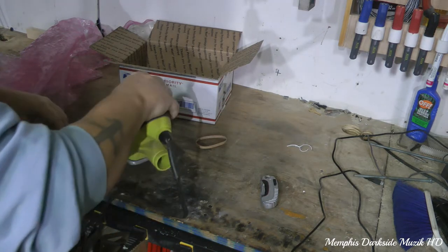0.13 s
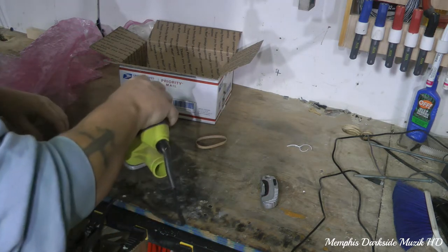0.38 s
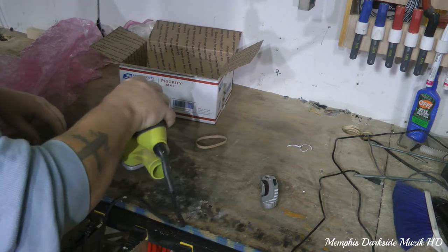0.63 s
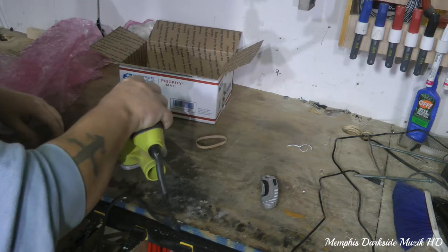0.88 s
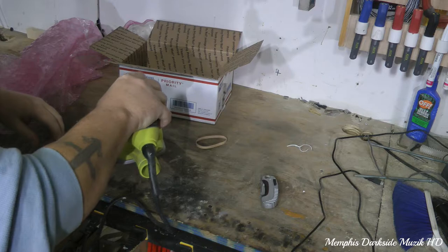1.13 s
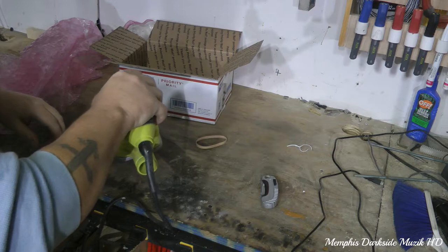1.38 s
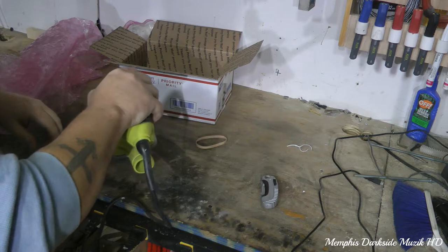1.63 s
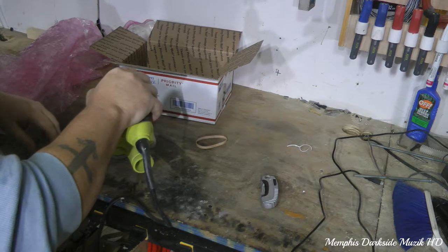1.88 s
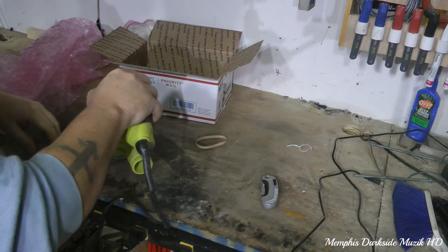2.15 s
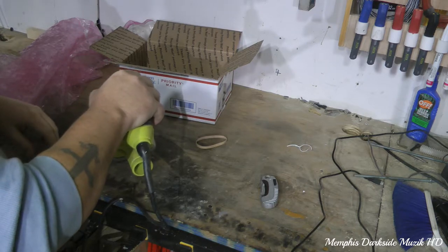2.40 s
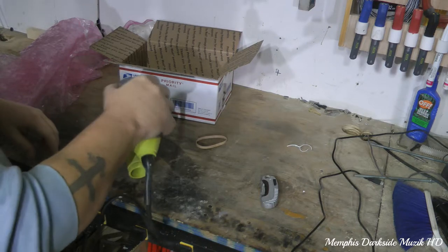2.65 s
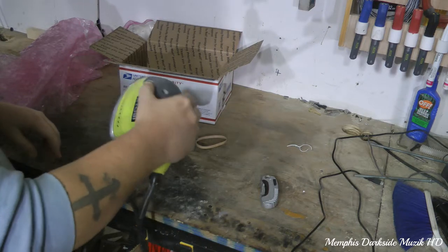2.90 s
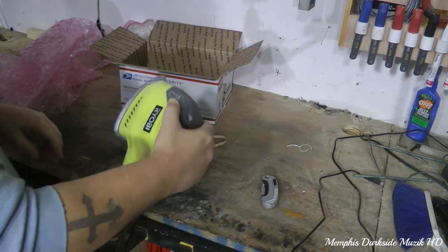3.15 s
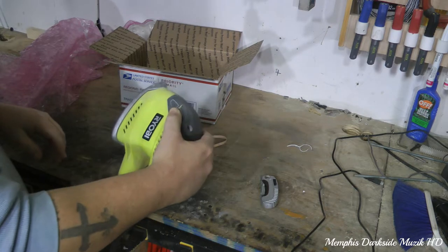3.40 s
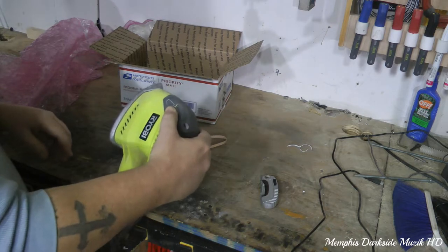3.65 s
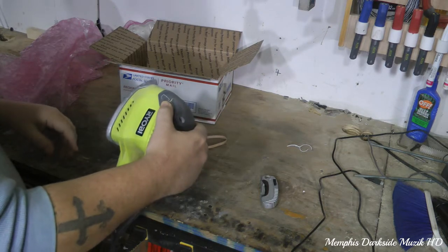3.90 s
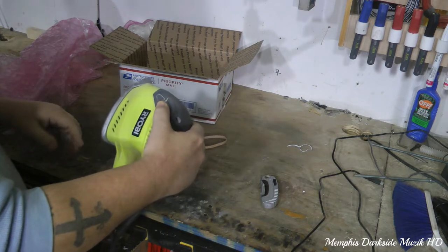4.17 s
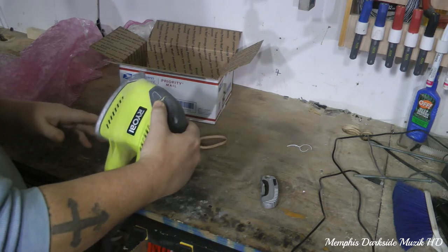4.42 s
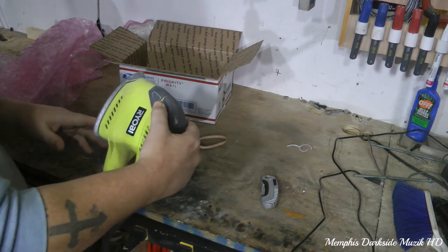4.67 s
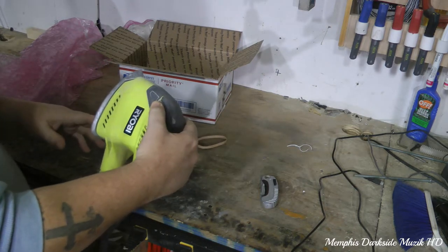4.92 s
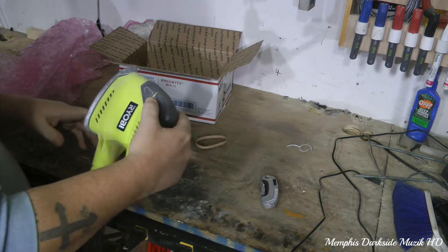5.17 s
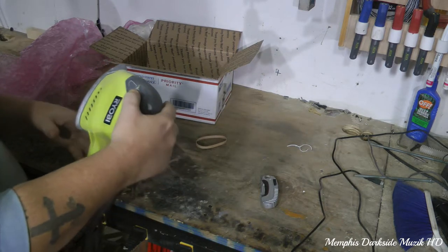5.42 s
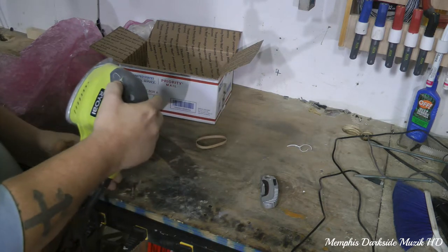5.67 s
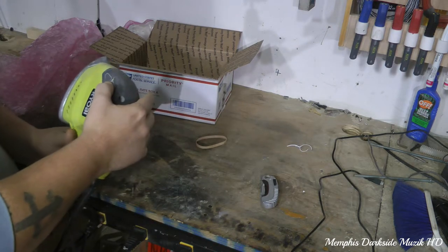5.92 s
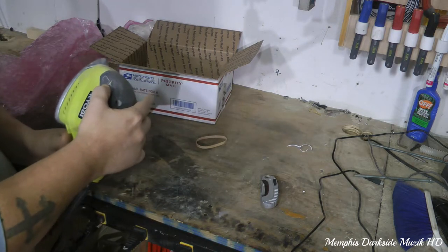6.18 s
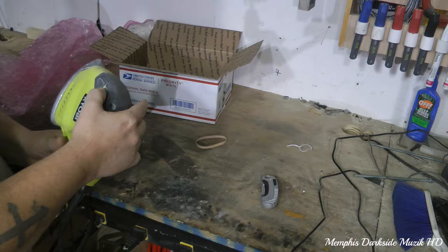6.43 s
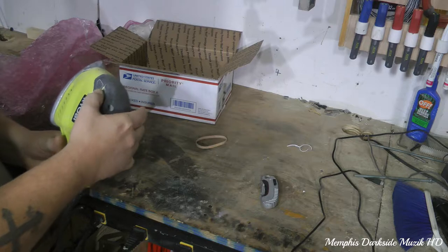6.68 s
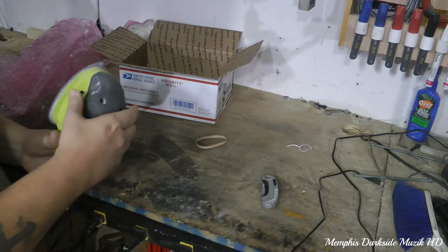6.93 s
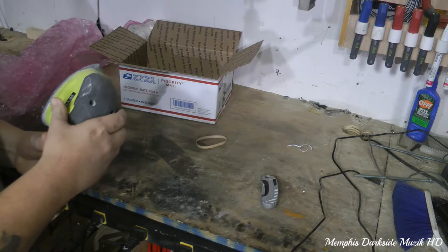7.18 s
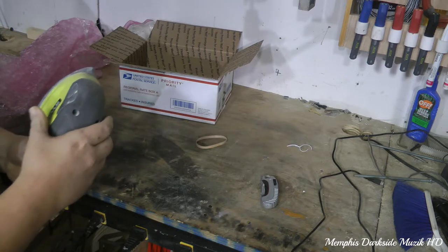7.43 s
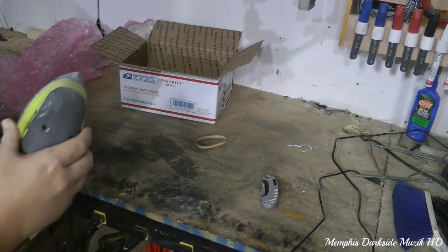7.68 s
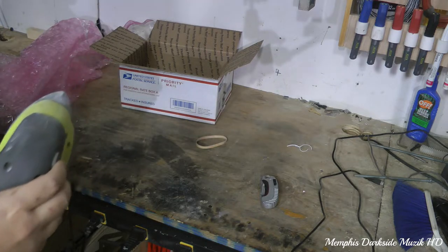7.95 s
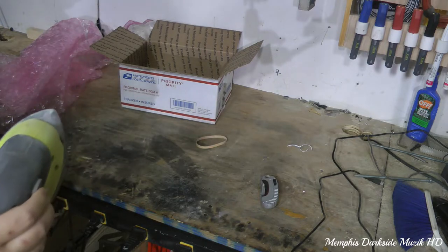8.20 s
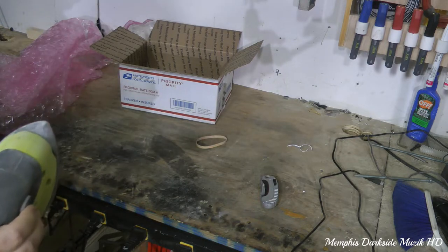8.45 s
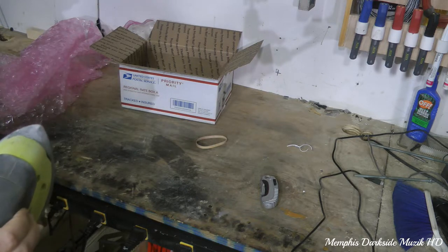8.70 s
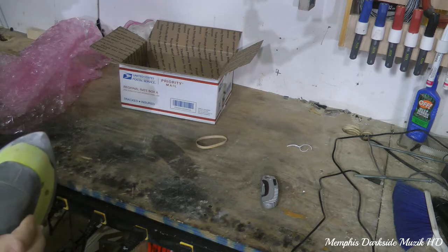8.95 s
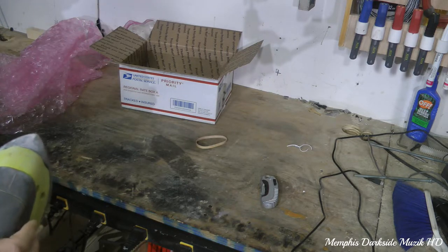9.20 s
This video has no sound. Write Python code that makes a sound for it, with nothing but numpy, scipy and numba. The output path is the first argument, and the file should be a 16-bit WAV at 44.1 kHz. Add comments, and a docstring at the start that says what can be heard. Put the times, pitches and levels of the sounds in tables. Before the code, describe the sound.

Close recording of a corded sander running unloaded. After a brief quiet of room rumble, a hard plastic click starts the motor, which rises within a second to a buzzing, hissing roar, its tones swelling as the tool is turned. A sharper click cuts power, the whine sinks and fades for over a second, then a last click starts it rising again.

```python
"""A small workshop: a hand-held palm sander is switched on, runs free in the air, is switched off, coasts to a stop
and is switched on again. Rotor unbalance, armature slots, fan blades and brushes are sines on multiples of the
shaft speed; the roar of cooling air is shaped noise that follows the speed. The rocker switch is chatter ringing
in housing modes. Ventilation noise, drone and mains hum lie below, ducked by the recorder's gain control."""
import sys
import numpy as np
from scipy import signal
from scipy.fft import rfft, irfft
from scipy.io import wavfile
from numba import njit

SR = 44100
rng = np.random.default_rng(int(sys.argv[2]) if len(sys.argv) > 2 else 0)


def master_out(mix):
    """Clip the mix to full scale and print it as 16-bit PCM to the path in sys.argv[1]."""
    frames = np.transpose(np.atleast_2d(mix))
    ceiling = np.clip(frames, -1, 1)
    pcm = np.round(ceiling * 32767).astype(np.int16)
    wavfile.write(sys.argv[1], SR, pcm)


def field_ratio(decibels):
    """Amplitude ratio for a level in dB (20 dB per decade); scalars and array-likes work."""
    return 10 ** (np.asarray(decibels, dtype=float) / 20)


N = 411453
HZ = np.maximum(np.fft.rfftfreq(N, 1 / SR), 1)
TIME = np.arange(N) / SR
FULL_SPEED = 190    # turns per s, the reference for the tone levels
MAINS_RIPPLE_HZ, CUTOFF_HZ = 120, 15850


def rms_one(x):
    """Scale to unit rms."""
    return x / np.sqrt(np.mean(x ** 2) + 1e-20)


def in_time(rows):
    """Columns of a table as curves, one value a sample."""
    s, *columns = np.transpose(rows)
    return [np.interp(TIME, s, column) for column in columns]


def at_hz(points, hz):
    """Read a spectrum on a log-frequency axis."""
    point_hz, value = np.array(points).T[:2]
    return np.interp(np.log(hz), np.log(np.maximum(point_hz, 1)), value)


def bump(hz, width_hz):
    """Bell of a resonance, 1 on top."""
    return 1 / (1 + (2 * (HZ - hz) / width_hz) ** 2)


def drift(rate_hz):
    """Slow random wander of spread 1: noise through two equal one-pole lowpasses, one value per 64 samples."""
    r = np.exp(-128 * np.pi * rate_hz / SR)
    slow = signal.lfilter([1], [1, -2 * r, r * r], rng.standard_normal(N // 64 + 2002))[2000:]
    return np.interp(np.arange(N) / 64, np.arange(len(slow)), rms_one(slow))


# Likeness of the two microphone ports: pitch_hz, likeness (0 to 1)
PORT_LIKENESS = [(60, 0.17), (180, 0.17), (550, 0.63), (1650, 0.77), (4970, 0.92), (15000, 0.83)]
# Balance of the ports: pitch_hz, left_over_right_db
PORT_BALANCE = [(60, 1), (190, -3), (380, 2.5), (1000, 2), (2400, 1.7), (5000, 0.6), (15000, 1)]


def stereo_noise():
    """Spectrum of white noise as two close microphone ports hear it."""
    mid, side = rfft(rng.standard_normal((2, N)))
    alike = np.sqrt(np.clip(at_hz(PORT_LIKENESS, HZ), 0, 1))
    pair = np.sqrt(1 + alike) * mid + np.sqrt(1 - alike) * side * [[1], [-1]]
    return pair * field_ratio(at_hz(PORT_BALANCE, HZ) * [[.5], [-.5]])


def tone(phase, level_db, waver_db, hz, in_step=False):
    """A wavering sine that reaches the two ports with their own level and, most in the bass, their own phase."""
    half = np.array([[.5], [-.5]])
    lag = .5 * rng.standard_normal() * np.sqrt(1 - np.clip(at_hz(PORT_LIKENESS, hz), 0, 1))
    sides = field_ratio(at_hz(PORT_BALANCE, hz) * half) * np.exp(1j * lag * half)
    start_phase = 0 if in_step else rng.uniform(0, 2 * np.pi)
    wave = np.exp(1j * (phase + start_phase))
    return np.sqrt(2) * field_ratio(level_db + waver_db * drift(5.7)) * (sides * wave).real


def sander():
    """Tones locked to the shaft over the roar; silent while the shaft stands."""
    speed, current = motor()
    shaft = 2 * np.pi * np.cumsum(speed * (1 + 0.000304 * drift(5.38))) / SR
    roar_db, low_db, treble_db = roar_levels(speed, current)
    steady, gliding = strong_voices(speed, current, shaft)
    brush_whine = brushes(speed, current, shaft, roar_db + treble_db)
    out = roar(shaft, roar_db, low_db, treble_db) + steady
    out += weak_orders(speed, shaft, roar_db)
    out += among_walls(gliding + brush_whine)
    out += housing_ring(speed, current, roar_db)
    out += shaking(roar_db)
    turning = speed > 4
    return out * signal.lfilter([.003], [1, -.997], turning)    # soft gate


# Motor under power: on_s, off_s, free_speed_turns_per_s (before the creep)
POWER_RUNS = [(0.6189, 6.30, 187.12), (8.607, 10, 189)]


def motor():
    """Shaft speed and share of current: it rises to free speed under power, then drag and friction stop it."""
    spin_up_s, settle_s, settle_share = 0.3103, 0.94, 0.0533    # quick rise, slow rest
    creep = 0.9745    # turns per s gained each second as it warms
    coast_s, friction_speed = 2.3, 276    # speed + friction_speed decays with coast_s
    field_dies_s = 0.09
    speed, current = np.zeros(N), np.zeros(N)
    for on_s, off_s, free_speed in POWER_RUNS:
        powered = np.clip(TIME, on_s, off_s) - on_s
        rise = 1 - (1 - settle_share) * np.exp(-powered / spin_up_s) - settle_share * np.exp(-powered / settle_s)
        driven = free_speed * rise + creep * powered
        after = np.maximum(TIME - off_s, 0)
        speed += np.maximum((driven + friction_speed) * np.exp(-after / coast_s) - friction_speed, 0)
        current += (TIME > on_s) * np.exp(-after / field_dies_s)
    return speed, current


def tone_bite(speed):
    """Tones die away when the shaft turns slowly."""
    return np.minimum(speed / 78, 1) ** 6


def below_full(speed):
    """How far the shaft is below full speed: 0 at full speed, 1 from two thirds of it down."""
    return np.clip(3 * (1 - speed / FULL_SPEED), 0, 1)


# Unbalance and its octave, slot tone with two mains sidebands, fan blades, slot overtones:
# shaft_multiple, mains_ripples_added
VOICES = [(1, 0), (2, 0), (12, -1), (12, 0), (12, 1), (20, 0), (24, 0), (36, 0)]
# Each voice against speed: fade_speed_turns_per_s (half amplitude), steepness, low_speed_db, coasting_db
VOICE_LAWS = [(149, 6.8, -5, -7.5), (111, 6.7, -5, -6), (156, 15, 7, -25), (148, 7, -8, -11),
              (140, 4, 0, -28), (144, 12, -7, -7), (87, 14, 8.5, -7), (148, 11, 0, 2)]
# Each voice swelling and fading as the tool is turned in the hand: time_s, level_db
VOICE_LEVELS = [
    [(1.2, -12.5), (1.9, -16.5), (2.7, -15), (3.7, -17), (4.6, -14.5), (5.7, -18), (6.3, -17), (8.6, -27)],
    [(1.1, -34), (2.9, -32.5), (3.3, -36.5), (6.0, -39.5), (8.6, -45)],
    [(1.5, -24), (2.0, -18), (2.6, -21), (3.1, -15.5), (4.55, -12.5), (4.8, -24), (5.1, -29), (5.6, -32),
     (6.3, -42)],
    [(1.55, -15.5), (2.1, -28), (3.0, -11.5), (3.25, -23), (3.6, -13.5), (4.5, -21), (5.3, -12.5),
     (5.8, -15), (6.3, -21), (8.6, -16)],
    [(1.55, -37), (1.8, -15), (2.5, -23), (2.9, -9), (3.2, -26), (3.5, -16.5), (5.35, -11.5), (5.55, -19.5),
     (6.3, -13), (8.6, -28)],
    [(1.35, -14), (2.2, -14.5), (2.72, -9.5), (2.9, -22), (3.6, -17.5), (4.5, -21), (4.75, -25),
     (5.1, -15.5), (6.3, -16), (8.6, -16)],
    [(1.2, -28), (1.55, -31), (1.85, -25), (2.2, -26), (2.7, -21.5), (3.6, -40), (4.75, -16), (5.4, -24),
     (6.3, -26), (8.6, -29)],
    [(1.25, -17), (2.05, -34), (2.4, -20), (3.3, -15.5), (4.15, -22), (4.7, -12), (5.4, -20), (5.6, -23),
     (6.3, -24), (8.6, -18)],
]


def strong_voices(speed, current, shaft):
    """Sines of unbalance, slots and fan blades on shaft multiples, split into a steady and a gliding share."""
    bite, slow = tone_bite(speed), below_full(speed)
    crawling = 1 / (1 + np.exp((speed - 142) / 14))
    ripple = 2 * np.pi * MAINS_RIPPLE_HZ * TIME
    steady, glides = 0, 0
    for (multiple, ripples), law, levels in zip(VOICES, VOICE_LAWS, VOICE_LEVELS):
        fade_speed, steep, low_speed_db, coasting_db = law
        gliding = slow * (multiple > 1)    # a fast glide meets its own echoes from bench and walls
        level_db = in_time(levels)[0] + low_speed_db * crawling + coasting_db * (1 - current)
        level_db = level_db + 3.5 * gliding * drift(54)    # patchy while gliding
        waver_db = 1.5 if multiple > 1 else .6
        phase = multiple * shaft + ripples * ripple
        voice = tone(phase, level_db, waver_db, multiple * FULL_SPEED, in_step=True)
        voice = voice * bite / (1 + (fade_speed / (speed + 1)) ** steep)
        steady += np.sqrt(1 - gliding) * voice
        glides += np.sqrt(gliding) * voice
    return steady, glides


# Cooling air by shaft speed, with current:
# speed_turns_per_s, roar_db, low_db (relative), treble_db (relative)
ROAR_POWERED = [(9, -60, -20, -14), (16, -22.5, -18, -14), (45, -27.5, -10, -14.5), (65, -25.5, -13, -10.5),
                (91, -23, -11, -11), (113, -18, -14, -10), (131.4, -17.5, -7, -8), (148, -14, -10, -6),
                (176, -10.5, -12.5, -9)]
# The same columns without current
ROAR_COASTING = [(2.98, -45, -20, -7), (14, -40, -15, -10), (27, -33, -13, -13), (54, -25.5, -11.5, -8.5),
                 (90, -22, -7.5, -9.5), (123, -20, -11, -6), (145, -20, -7.5, -7), (175, -17, -12, -12.5),
                 (190, -7, -15, -9)]
# Offsets as the tool is turned in the hand: time_s, roar_db, treble_db, shaking_db
HAND_TURNS = [(1.75, -0.1, 0.5, -1), (2.1, -.5, -0.5, 2), (3.2, -0.5, 0, 0), (4.0, -0.5, -1.5, -1),
              (4.8, 0.8, -2, -4), (5.6, -1, -1, -4), (6.0, -1, -1, 1), (6.28, 0.6, -1, -1),
              (8.6, -2, -0.5, 4)]


def roar_levels(speed, current):
    """Roar, low part and treble part follow the speed, by one law with current and another without."""
    laws = np.transpose(ROAR_POWERED), np.transpose(ROAR_COASTING)
    powered, coasting = (np.array([np.interp(speed, law[0], c) for c in law[1:]]) for law in laws)
    roar_db, low_db, treble_db = current * powered + (1 - current) * coasting
    held_db, held_treble_db, _ = in_time(HAND_TURNS)
    return roar_db + current * held_db, low_db, treble_db + current * held_treble_db


# Relative spectrum of the cooling air: pitch_hz, level_db (per Hz)
AIR_SPECTRUM = [(150, -44), (260, -27.5), (380, -20), (509, -19.5), (565, -14), (648, -20), (757, -13),
                (884, -18.5), (1050, -15), (1950, -10), (2360, -6.5), (6530, -8.5), (10200, -18),
                (13900, -22.5), (16000, -23.5)]
# Housing resonances in the roar: pitch_hz, width_hz, boost_db
HOUSING_MODES = [(730, 270, 2.5), (1061, 11.5, 11.5), (1455, 140, 8.5), (1752, 93, 3)]


def roar(shaft, roar_db, low_db, treble_db):
    """Turbulent air through the housing, throbbing twice a turn and with the mains ripple."""
    housing_db = sum(db * bump(hz, width) for hz, width, db in HOUSING_MODES)
    colour = stereo_noise() * field_ratio(at_hz(AIR_SPECTRUM, HZ) + housing_db)
    above_low, above_mid = 1 / (1 + (1500 / HZ) ** 8), 1 / (1 + (6000 / HZ) ** 8)
    parts = 1 - above_low, above_low - above_mid, above_mid
    low, mid, top = (rms_one(irfft(colour * part, N)) for part in parts)
    throb = 1 + 0.072 * np.cos(2 * shaft) + 0.036 * np.cos(2 * np.pi * MAINS_RIPPLE_HZ * TIME)
    flutter = field_ratio(0.37 * drift(24))
    return field_ratio(roar_db) * throb * flutter * (field_ratio(low_db) * low + mid + field_ratio(treble_db) * top)


# Overtones of brushes on twelve commutator bars: shaft_multiple, level_db (over the roar's treble at its pitch)
BRUSH_TONES = [(48, 7), (60, 2), (72, 4), (84, 3.5), (96, 3), (108, 3.5), (120, 0), (132, 8), (144, -3),
               (156, 3)]


def brushes(speed, current, shaft, air_treble_db):
    """Brushes tick over the commutator; uneven bars make each overtone swell once a turn."""
    bite, slow = tone_bite(speed), below_full(speed)
    whine = 0
    for multiple, level_db in BRUSH_TONES:
        swell = 1 + 0.73 * np.cos(shaft + rng.uniform(0, 2 * np.pi))
        heard = multiple * speed < CUTOFF_HZ
        # below full speed the air is quieter against the brushes
        slow_db = 4 * (multiple > 48) - 2 * (1 - current) + 3 * drift(30)
        whine_db = level_db + air_treble_db + at_hz(AIR_SPECTRUM, multiple * speed + 1) + slow * slow_db
        overtone = tone(multiple * shaft, whine_db, 2.4, multiple * FULL_SPEED)
        whine += swell * heard * np.sqrt(bite) * overtone
    return whine


def among_walls(x):
    """Direct sound plus a short tail from bench and walls: glides blur and break up."""
    after = TIME[:SR // 5]
    tail = rng.standard_normal(len(after)) * field_ratio(-60 * after / .3)
    tail *= .8 / np.sqrt(np.sum(tail ** 2))
    tail[0] = .6    # direct sound
    return signal.oaconvolve(x, tail[None])[:, :N]


# Weak shaft multiples: shaft_multiple, level_db (at full speed and full roar)
WEAK_ORDERS = [(3, -37), (4, -34), (5, -36), (6, -41.5), (8, -30), (9, -33), (10, -31), (11, -35.5),
               (13, -63), (14, -30.5), (18, -27.5), (19, -27.5), (21, -29), (22, -33), (23, -31), (32, -30),
               (35, -32), (37, -30.5), (40, -40)]


def weak_orders(speed, shaft, roar_db):
    """Weak multiples follow the roar's level and take the colour of its air as they glide."""
    full_roar_db = -12
    out = 0
    for multiple, level_db in WEAK_ORDERS:
        full_hz = multiple * FULL_SPEED
        glide_db = at_hz(AIR_SPECTRUM, multiple * speed + 1) - at_hz(AIR_SPECTRUM, full_hz)
        out += tone(multiple * shaft, level_db + roar_db - full_roar_db + glide_db, 3.8, full_hz)
    return tone_bite(speed) * out


# Housing resonances heard below full speed: pitch_hz, width_hz, level_db (relative to the roar, without current)
HOUSING_RINGS = [(1080, 25, -11), (1450, 30, -9)]


def housing_ring(speed, current, roar_db):
    """Housing resonances ring as narrow noise bands while the speed is below full."""
    out = 0
    for hz, width_hz, level_db in HOUSING_RINGS:
        ringing = rms_one(irfft(stereo_noise() * bump(hz, width_hz), N))
        out += field_ratio(roar_db + level_db - 4 * current + 1.5 * drift(10)) * ringing
    return below_full(speed) * tone_bite(speed) * out


def shaking(roar_db):
    """Dull shaking carried by hand and bench: noise from 15 to 90 Hz that follows the roar."""
    band = signal.butter(2, [15, 90], "band", fs=SR, output="sos")
    shake = signal.sosfilt(band, rng.standard_normal((2, N)))
    return field_ratio(roar_db - 37.5 + in_time(HAND_TURNS)[2] + 2 * drift(4)) * rms_one(shake)


# Rocker switch: start_s, snap_peak_db, thump_db (before its decay)
SWITCH_SNAPS = [(0.6346, -0.5, -21), (6.377, 4.5, -9), (8.6174, 0.5, -11)]
# Housing modes the snap rings: pitch_hz, level_db (relative), t60_s
SNAP_MODES = [(1880, -4, 0.0089), (3300, 7, 0.00061), (4400, 8.5, 0.0011), (6400, -4, 0.0038),
              (9600, -30, 0.0023)]


def switch():
    """The rocker snaps over and chatters for some ms into the housing modes; a low thump and a room tail follow."""
    out, after = np.zeros((2, N)), TIME[:SR // 4]
    highpass = signal.butter(4, 1550, "high", fs=SR, output="sos")
    for start_s, peak_db, thump_db in SWITCH_SNAPS:
        chatter = rng.standard_normal(len(after))
        chatter *= 1 - np.exp(-after / 0.00055)
        chatter *= np.exp(-after / 0.0092) + 0.091 * np.exp(-after / 0.013)
        snap = .5 * chatter
        for hz, level_db, t60_s in SNAP_MODES:
            r, w = field_ratio(-60 / (t60_s * SR)), 2 * np.pi * hz / SR
            ring = signal.lfilter([0, np.sin(w)], [1, -2 * r * np.cos(w), r * r], chatter)
            snap = snap + field_ratio(level_db + rng.normal(0, 0.5)) * ring
        snap = signal.sosfilt(highpass, snap)
        snap = field_ratio(peak_db) * snap / np.abs(snap).max()
        thump = field_ratio(thump_db) * np.sin(2 * np.pi * 55 * after) * np.exp(-after / 0.0032)
        walls = rng.standard_normal((2, len(after))) * np.exp(-after / 0.017) * field_ratio(-36.5)
        tail = signal.fftconvolve(snap[None], walls)[:, :len(after)]
        at = round(start_s * SR)
        out[:, at:at + len(after)] += snap + thump + tail
    return out


# Relative spectrum of the ventilation noise: pitch_hz, level_db (per Hz)
VENT_SPECTRUM = [(24, -54), (40, -22), (85, -9), (112, -9), (180, -4.5), (305, -2), (402, -9), (715, -8.5),
                 (896, -14), (1950, -11), (3140, -16), (4570, -17), (8550, -33.5), (14100, -40.5),
                 (16000, -38)]
# Ventilation drone: pitch_hz, width_hz, level_db
VENT_DRONE = [(160, 8.9, -56.5), (199, 18, -57.5), (314, 24, -57.5), (1890, 580, -57)]


def ventilation():
    """Broad shaped noise of the ventilation with a few droning bands."""
    white = stereo_noise()
    broad = rms_one(irfft(white * field_ratio(at_hz(VENT_SPECTRUM, HZ)), N))
    out = field_ratio(-40.5 + 0.61 * drift(13)) * broad
    for hz, width_hz, level_db in VENT_DRONE:
        out += field_ratio(level_db) * rms_one(irfft(white * bump(hz, width_hz), N))
    return out


# Mains ripple and its octave: level_db
HUM_LEVELS = [-48, -47.5]


def mains_hum():
    """Gently wavering sines on the mains ripple and its octave."""
    out = 0
    for k, level_db in enumerate(HUM_LEVELS, 1):
        hz = k * MAINS_RIPPLE_HZ
        out += tone(2 * np.pi * hz * TIME, level_db, 0.59, hz)
    return out


def scene():
    """Tool, switch and room."""
    return sander() + switch() + ventilation() + mains_hum()


@njit
def gain_control(power, knee_db, slope, attack, release):
    """Block by block: the louder the output, the lower the gain; quick down, slow up."""
    gain_db, now, level = np.zeros(len(power)), 0.0, 1e-4
    for b in range(len(power)):
        level += .25 * (power[b] * 10 ** (now / 10) - level)
        wanted = min(0.0, -slope * (10 * np.log10(level) - knee_db))
        now += (wanted - now) * (attack if wanted < now else release)
        gain_db[b] = now
    return gain_db


def band_limit(x):
    """A steep low-pass at the top of the band."""
    return signal.sosfilt(signal.butter(12, 16460, fs=SR, output="sos"), x)


# Dips of the microphone housing: pitch_hz, width_hz, level_db
MIC_DIPS = [(914, 160, -4), (1340, 110, -3), (1532, 88, -8.5)]


def record(dry):
    """Microphone housing dips, automatic gain control, then the top is cut."""
    dips_db = sum(db * bump(hz, width) for hz, width, db in MIC_DIPS)
    dry = irfft(rfft(dry) * field_ratio(dips_db), N)
    blocks = N // 64
    power = (dry[:, :blocks * 64] ** 2).mean(axis=0).reshape(blocks, 64).mean(axis=1)
    gain_db = gain_control(power, knee_db=-31.0, slope=1.0, attack=0.12, release=0.001)
    gain = field_ratio(np.interp(np.arange(N) / 64, np.arange(blocks), gain_db))
    cut = signal.cheby2(16, 45, CUTOFF_HZ * 1.02, fs=SR, output="sos")
    mix = signal.sosfilt(cut, dry * gain)
    return band_limit(mix)


dry = scene()
out = record(dry)
master_out(out)
```